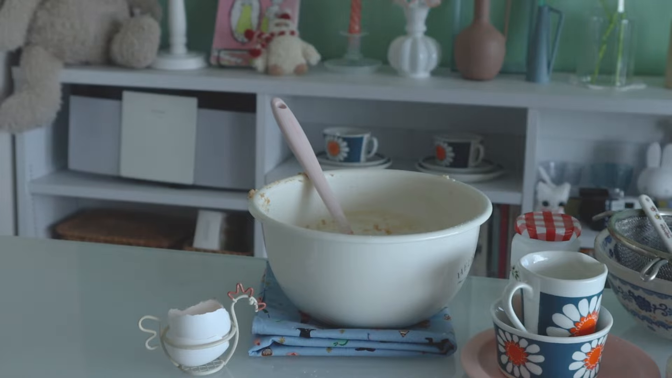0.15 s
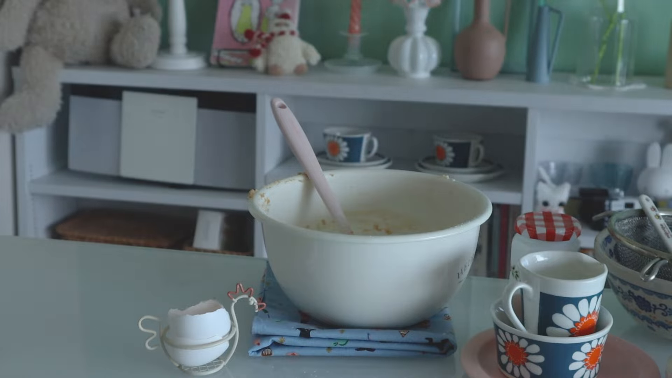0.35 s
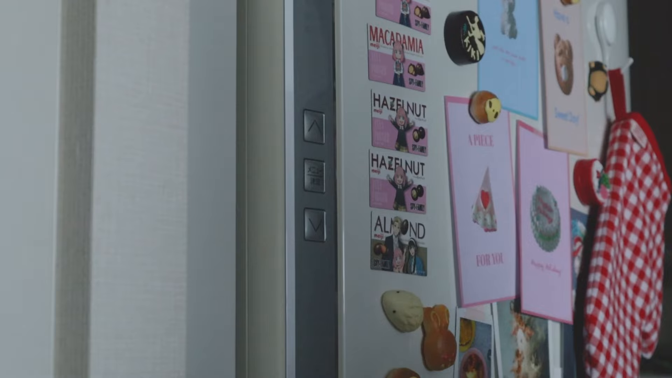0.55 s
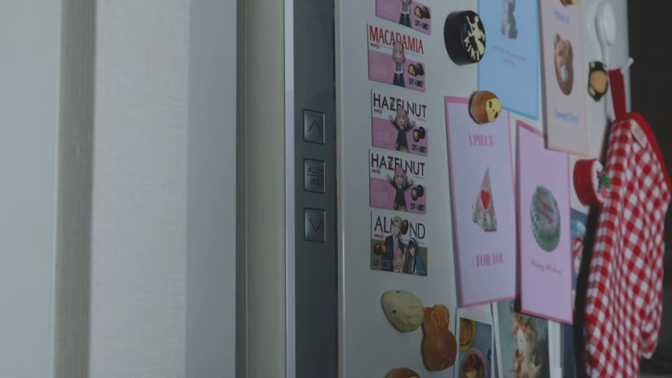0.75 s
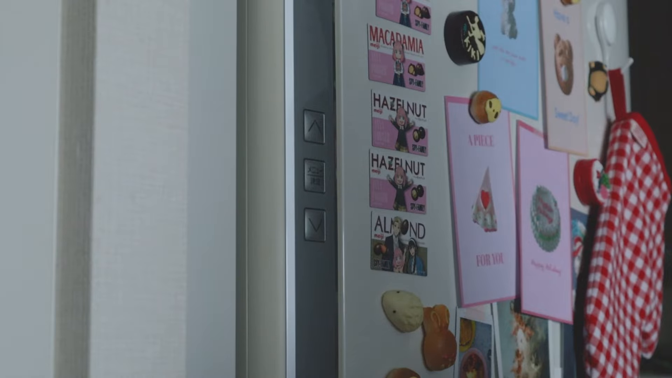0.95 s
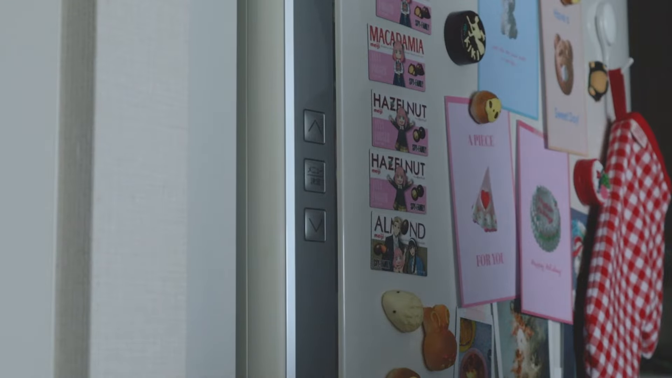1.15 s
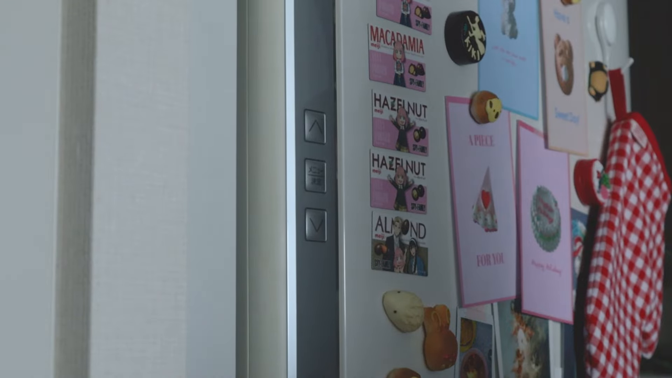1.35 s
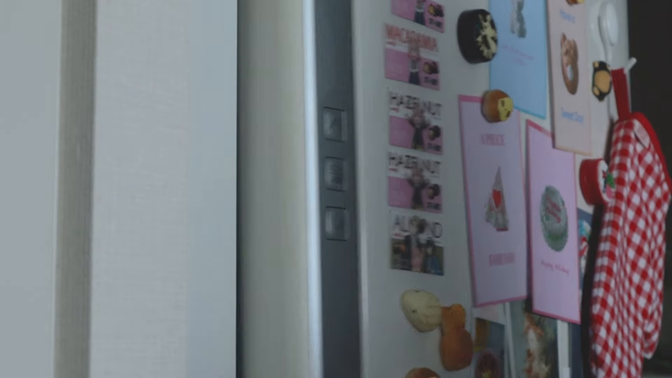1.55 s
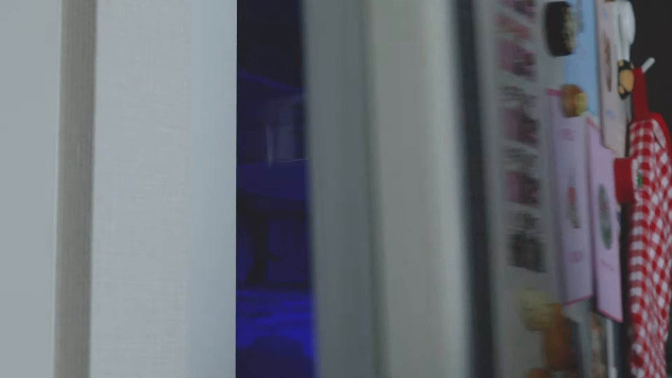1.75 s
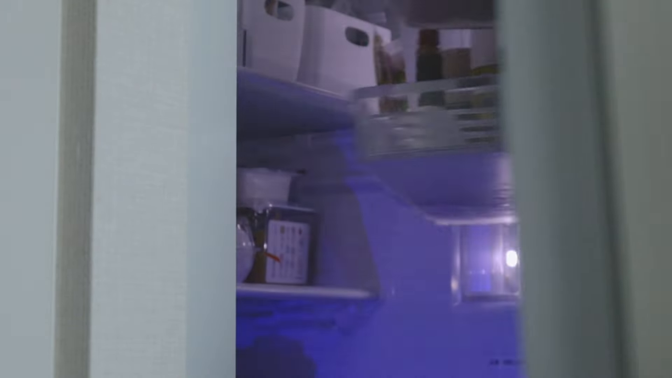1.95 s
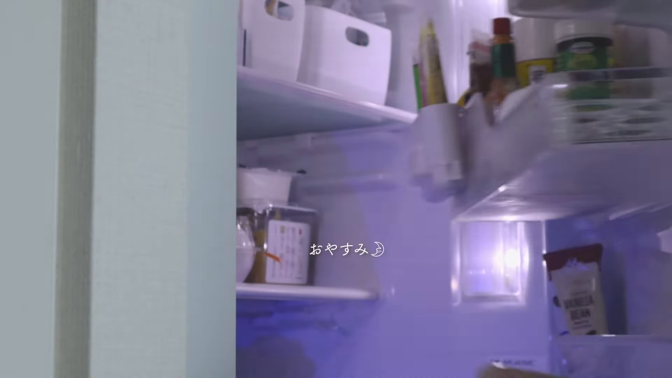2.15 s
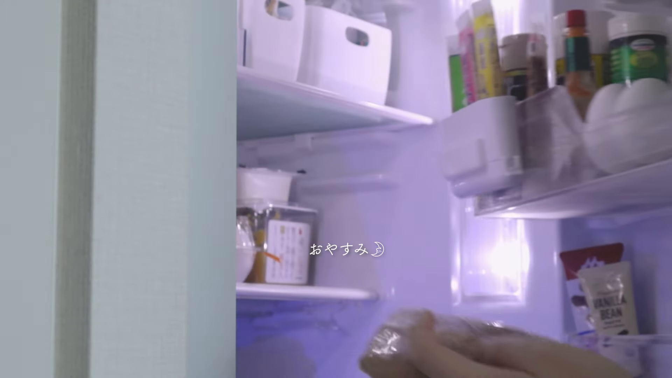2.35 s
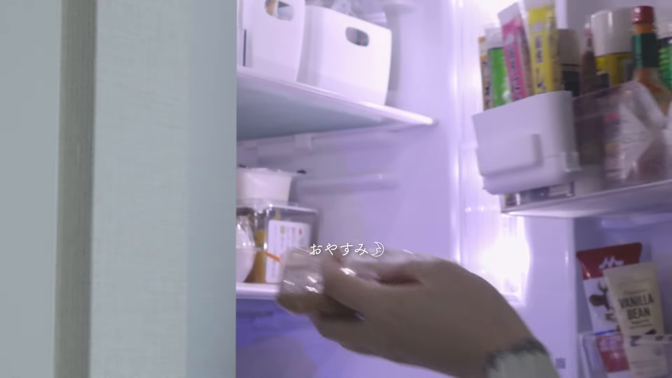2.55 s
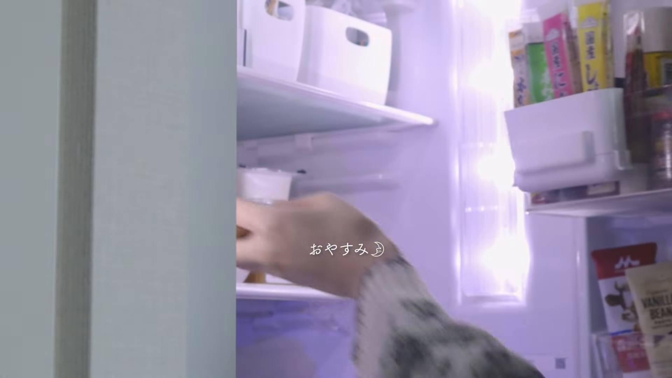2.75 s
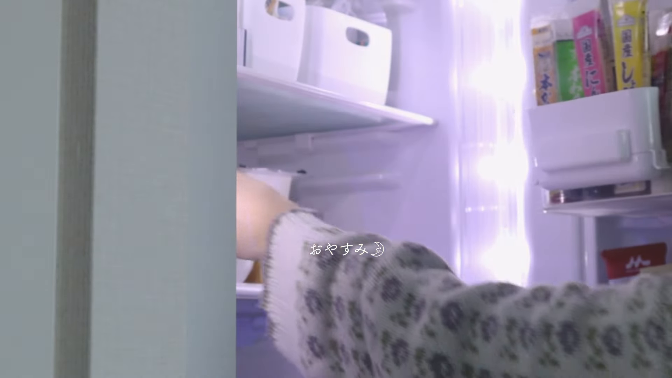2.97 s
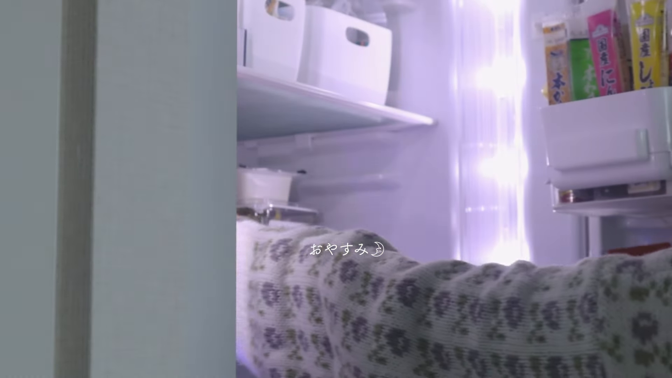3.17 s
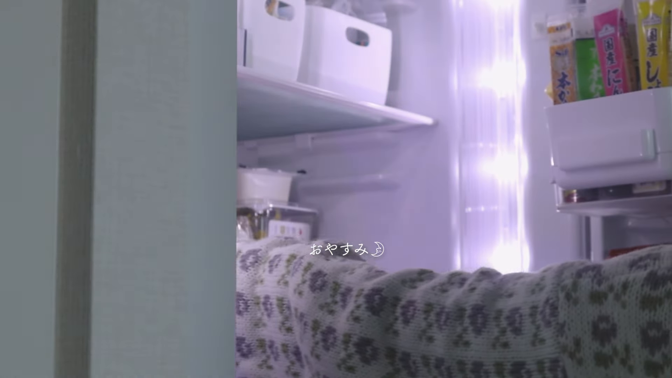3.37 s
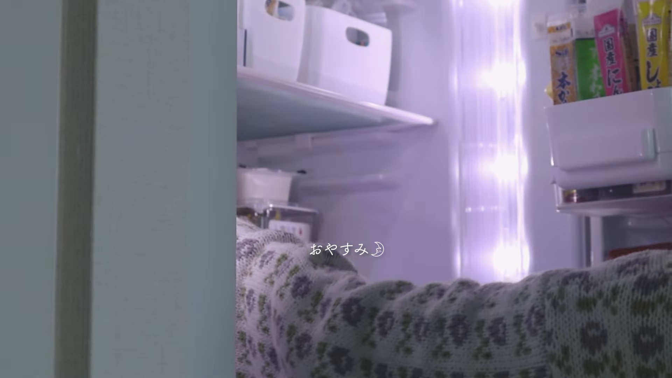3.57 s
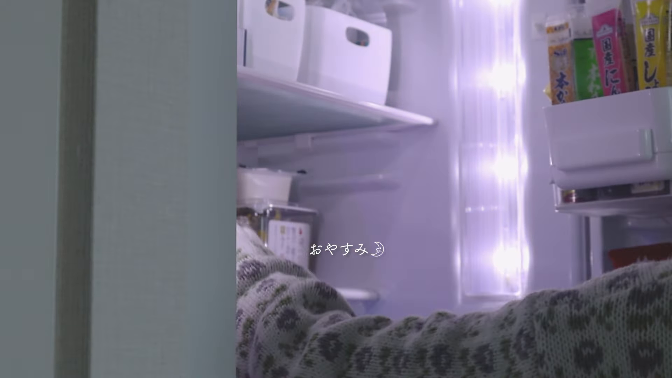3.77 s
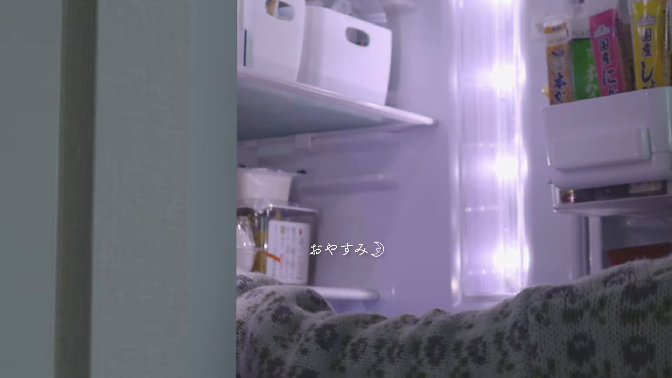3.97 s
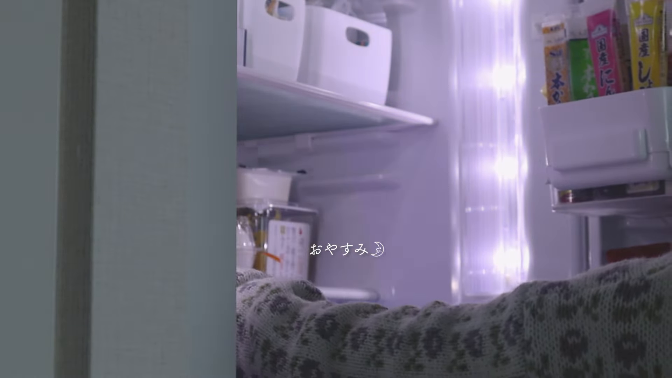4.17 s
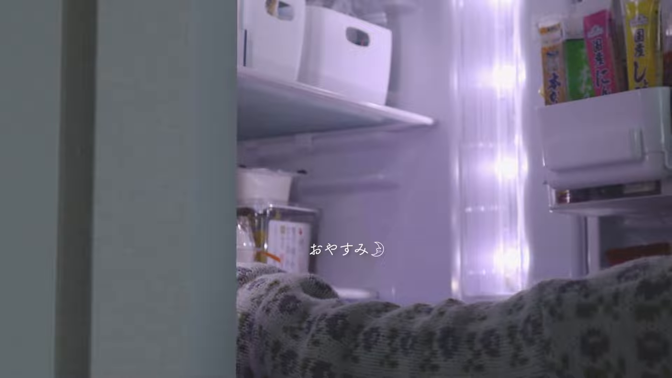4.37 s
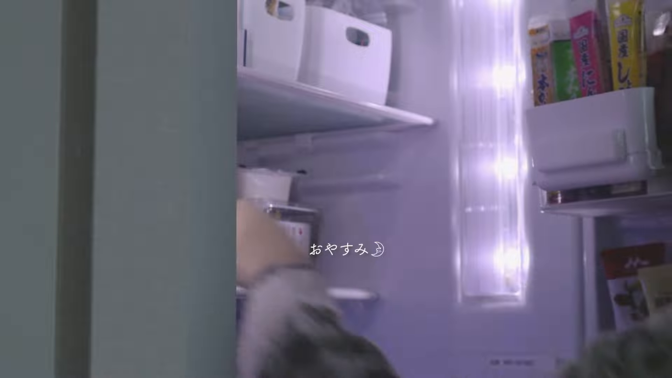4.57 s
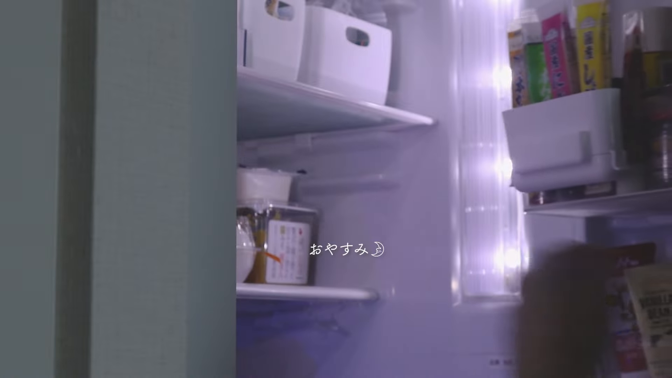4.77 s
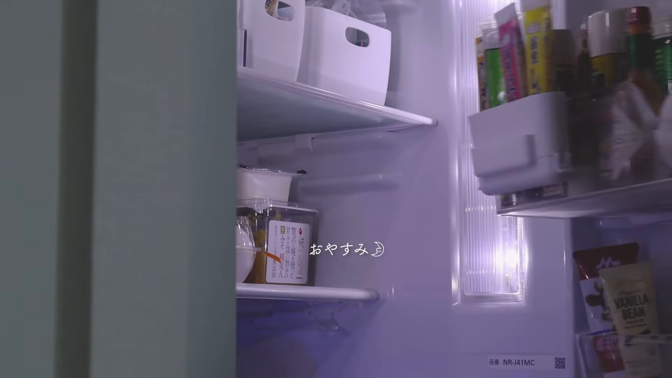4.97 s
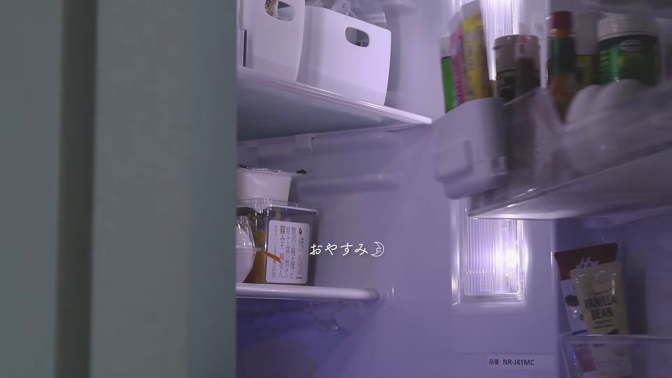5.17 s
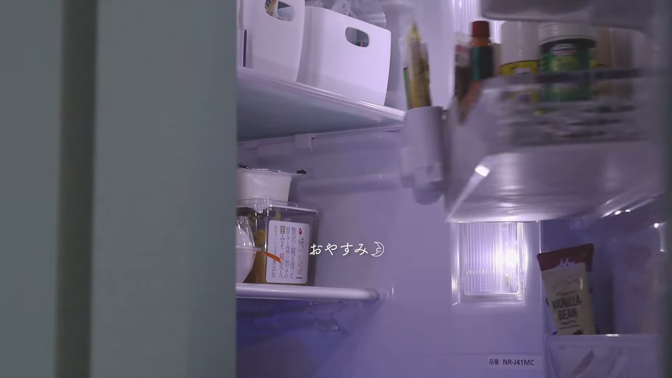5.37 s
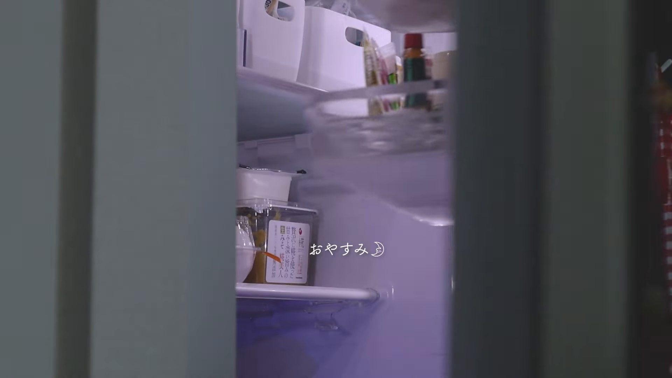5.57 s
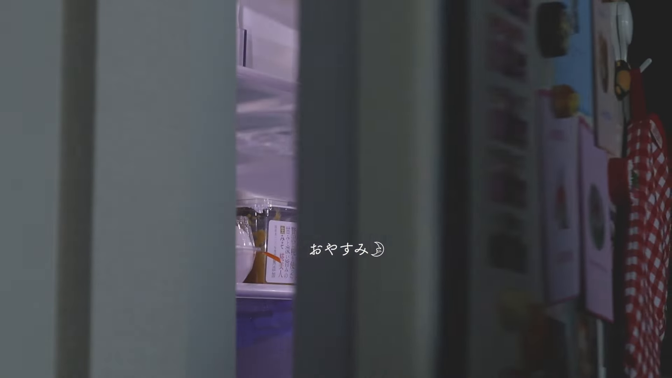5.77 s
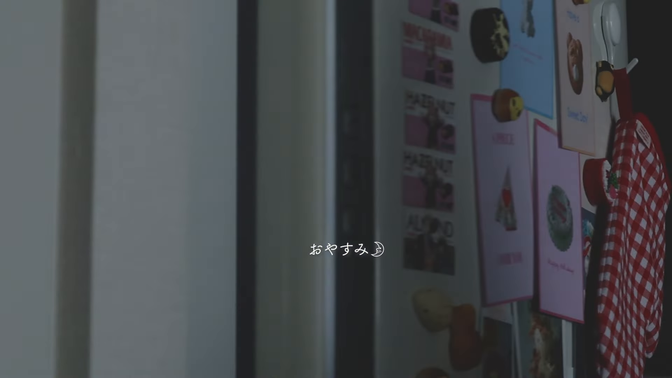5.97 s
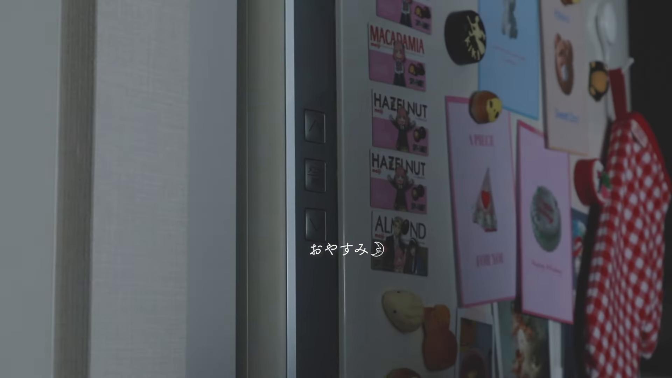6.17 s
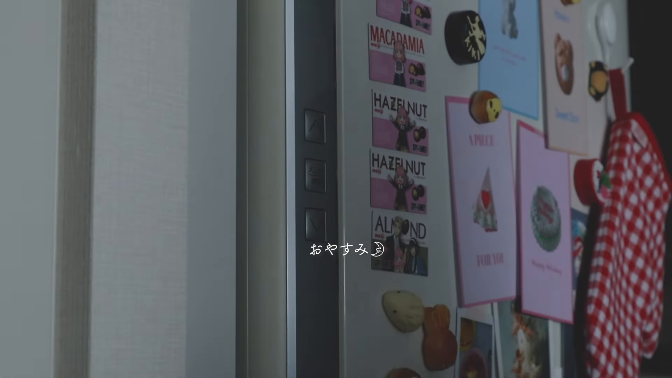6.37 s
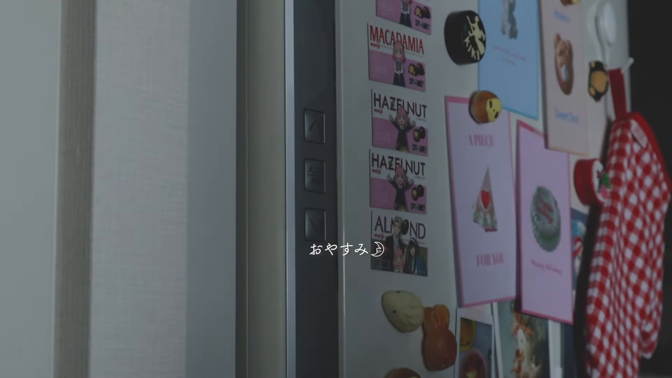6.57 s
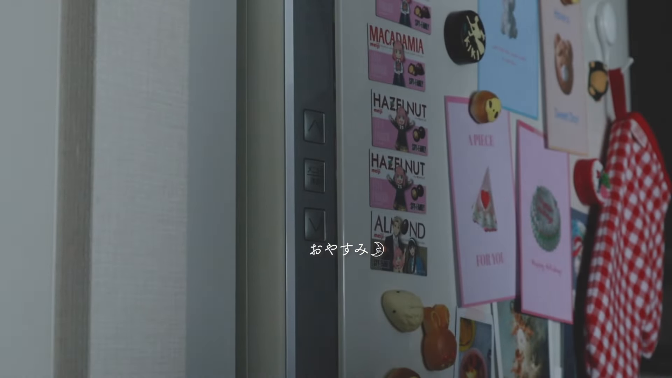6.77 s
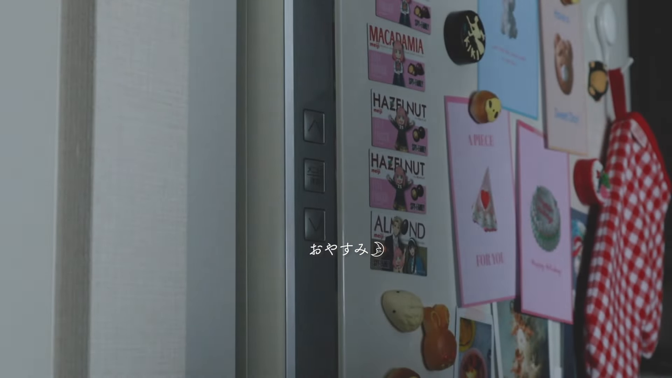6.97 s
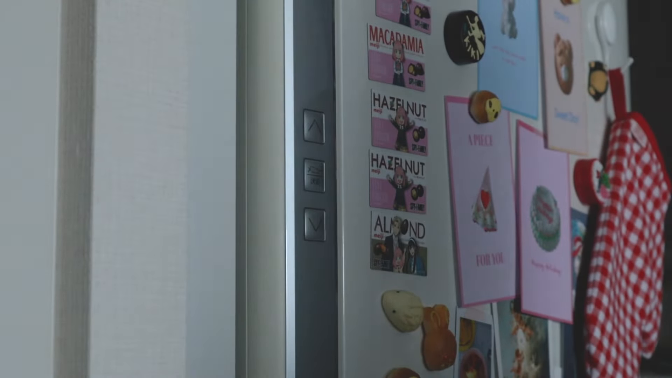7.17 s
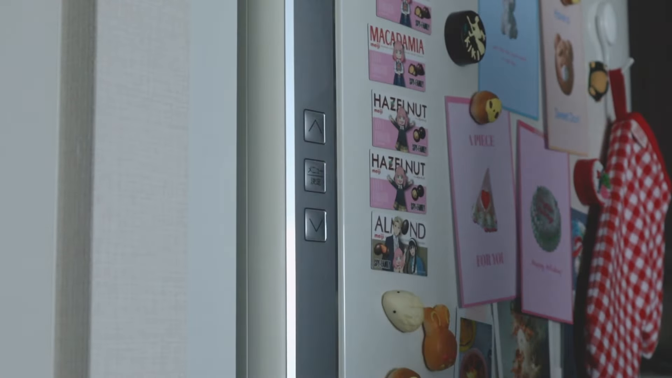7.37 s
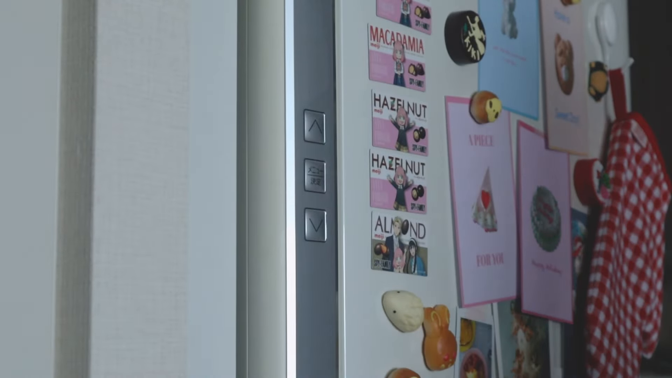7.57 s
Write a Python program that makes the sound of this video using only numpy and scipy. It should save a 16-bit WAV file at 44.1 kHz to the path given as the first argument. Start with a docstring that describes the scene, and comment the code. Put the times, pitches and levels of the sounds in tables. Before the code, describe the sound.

Close view of a fridge in a small, quiet kitchen with low hum and steady hiss. Faint sleeve swishes, then the door seal groans, peels and lets go with a loud hard knock. Bottles rock lightly in the door rack, wrapping crinkles, and a bowl taps a shelf. After a lull the door squeaks, bumps and slams with a dull double thud, followed by faint rustles.

```python
"""A small kitchen hums and hisses; things shift, a sleeve swishes, then a fridge door is pulled off its seal.
Bottles rock in the rack, a wrapped bowl is set on a shelf, and the bottles rock again.
The door swings to, bumps over its closer, slams and rebounds; a few last swishes and shifts follow.
Blows and rubs are noise forces ringing decaying sines; swishes and crinkles are filtered noise.
The near sounds also echo in the kitchen, over a steady hiss that is stronger again above 12 kHz."""
import sys
import numpy as np
from scipy import signal
from scipy.fft import rfft, irfft
from scipy.io import wavfile
from scipy.ndimage import uniform_filter1d

SR = 44100
rng = np.random.default_rng(int(sys.argv[2]) if len(sys.argv) > 2 else 0)


def materialize(psi):
    """Save the field psi as 16-bit PCM at rate SR to the path in sys.argv[1].

    A 1-D psi becomes a single channel; in a 2-D psi each row is a channel.
    """
    bounded = np.clip(np.atleast_2d(psi).T, -1, 1)
    quanta = np.round(bounded * 32767).astype(np.int16)
    wavfile.write(sys.argv[1], SR, quanta)


N = 336249   # length in samples


def from_db(db):
    """Decibels become a plain factor; 20 dB is ten times the height."""
    return 10 ** (np.asarray(db) / 20)


def rms_one(x):
    """Scale a sound to an average (rms) level of 1."""
    return x / np.sqrt(np.mean(x ** 2) + 1e-20)


def in_time(rows):
    """Draw straight lines between rows of (time_s, values), one curve for each value column."""
    times_s, *columns = np.transpose(rows)
    seconds = np.arange(N) / SR
    return [np.interp(seconds, times_s, column) for column in columns]


def at_hz(points, hz):
    """Read a curve of (pitch_hz, value) at any pitch, with pitch on a log scale."""
    pitches_hz, values = np.array(points).T[:2]
    return np.interp(np.log(hz + 1), np.log(pitches_hz), values)


def colour(x, spectrum):
    """Raise and lower the pitches of a noise by a curve of (pitch_hz, level_db)."""
    gains = from_db(at_hz(spectrum, np.fft.rfftfreq(len(x), 1 / SR)))
    return irfft(rfft(x) * gains, len(x))


def band(x, low_hz, high_hz):
    """Keep the pitches between two edges."""
    return signal.sosfilt(signal.butter(2, [low_hz, high_hz], "band", fs=SR, output="sos"), x)


def drift(rate_hz):
    """Slow random wandering with an rms of 1: noise smoothed by a two-pole filter."""
    pole = np.exp(-2 * np.pi * rate_hz / SR)
    wander = signal.lfilter([1], [1, -2 * pole, pole * pole], rng.standard_normal(N + SR))
    return rms_one(wander[SR:])   # the filter settles in the first second


def ring(force, hz, t60_s):
    """A force drives a sine that falls 60 dB in t60_s; a unit click starts it at height 1."""
    pole = from_db(-60 / (t60_s * SR))
    angle = 2 * np.pi * hz / SR
    return signal.lfilter([0, np.sin(angle)], [1, -2 * pole * np.cos(angle), pole * pole], force)


def add(out, start_s, sound):
    """Mix a sound into out from its start time."""
    at = round(start_s * SR)
    out[at:at + len(sound)] += sound[:N - at]


def dying(t60_s, rise_s, lumpy_db=2.5):
    """Uneven noise that rises and dies away, like a contact that chatters."""
    t60_s = max(t60_s, .01)
    t = np.arange(round(SR * min(t60_s * 1.5, 1.5))) / SR
    lumps = np.repeat(rng.standard_normal(len(t) // 100 + 1), 100)[:len(t)]   # a new level every 100 samples
    rise = 1 - np.exp(-t / max(rise_s, 2e-4))
    fall_db = -60 * (t / t60_s) ** 1.092   # holds a little at first, then falls faster
    return rng.standard_normal(len(t)) * rise * from_db(lumpy_db * lumps + fall_db)


MODE_SPREAD = .025   # short modes shift at random by about this share of their pitch


def struck(force, contact_hz, modes, narrow_db, clatter_db):
    """A contact rings the modes near its own pitch (soft low, hard high), over a dense clatter."""
    force = np.pad(force, (0, SR // 5))   # room to ring on
    force = band(force, 0.11 * contact_hz, 4.1 * contact_hz)   # a contact of finite length holds little treble
    body = 0
    for k, (hz, db, t60_s) in enumerate(modes):
        octaves_away = np.log2(hz / contact_hz)
        mode_db = db - narrow_db * octaves_away ** 2 + 1.6 * rng.normal()
        mode_hz = hz * (1 + MODE_SPREAD * rng.normal() * (t60_s < .08))
        sign = (-1) ** k   # neighbours push in opposite directions
        body = body + from_db(mode_db) * ring(force, mode_hz, t60_s) * sign
    clatter = band(force, 0.51 * contact_hz, 1.606 * contact_hz)
    return rms_one(body) + from_db(clatter_db) * rms_one(clatter)


FIRST_TOUCH_DB = 10.5   # height of the click added to the chatter


def blows(table, modes, narrow_db, clatter_db, rise_s):
    """Each row (start_s, level_db, chatter_t60_s, contact_hz) is a first touch, then a chattering contact."""
    out = np.zeros(N)
    for start_s, level_db, t60_s, contact_hz in table:
        force = dying(t60_s, rise_s, 2.5)
        force[round(rise_s * SR)] += from_db(FIRST_TOUCH_DB)
        body = struck(force, contact_hz, modes, narrow_db, clatter_db)
        loudest_rms = np.sqrt(uniform_filter1d(body ** 2, size=400).max())   # over about 9 ms
        add(out, start_s, from_db(level_db) * body / (2.3 * loudest_rms))   # 2.3: rough peak over rms
    return out


def rub(curve, modes, contact_hz, narrow_db, clatter_db, lumpy_db):
    """A lasting rough contact slips unevenly and rings the modes; the curve is (time_s, level_db)."""
    start, stop = round(curve[0][0] * SR), round(curve[-1][0] * SR)
    level = from_db(in_time(curve)[0][start:stop])
    slips = from_db(lumpy_db * drift(60)[:len(level)]) * rng.standard_normal(len(level))
    body = struck(level * rms_one(slips), contact_hz, modes, narrow_db, clatter_db)
    out = np.zeros(N)
    add(out, curve[0][0], body * np.sqrt(np.sum(level ** 2) / len(body)))
    return out


# ringing of the door panel and its liner: pitch_hz [Hz], relative level_db [dB], t60_s [s]
DOOR_MODES = [(349, 18, 0.048), (408, 5, 0.12), (512, 12, 0.027), (612, -6.5, 0.069), (721, 8.5, 0.026),
              (834, 3, 0.023), (1490, -2, 0.016), (1530, -3, 0.013), (1870, -12.5, 0.03),
              (2630, -12.5, 0.016), (3570, -3.5, 0.016)]
# hard knocks on the door (handle, seal letting go, closer, slam):
# start_s [s], ring level_db [dB], chatter_t60_s [s], crack_db before colouring [dB]
DOOR_KNOCKS = [(1.171, -33.5, 0.14, -54), (1.568, -40, 0.4, -44), (1.615, -21.5, 0.062, -37),
               (1.694, -26, 0.05, -45.5), (1.733, -24.5, 0.13, -43.5), (1.782, -9.5, 0.073, -20),
               (1.912, -39, 0.1, -77), (5.853, -44, 0.5, -69), (5.917, -27.5, 0.17, -60),
               (5.997, -29, 0.16, -72), (6.048, -45, 0.42, -68.5), (6.089, -42.5, 0.1, -63),
               (6.193, -36.5, 1, -66), (6.222, -18.5, 0.1, -18), (6.35, -44, 0.2, -65)]
KNOCK_HZ = 1100   # pitch of a hard contact


def door_knocks():
    """Hard contacts ring the door panel around their high contact pitch."""
    rows = [(start_s, db, t60_s, KNOCK_HZ) for start_s, db, t60_s, _ in DOOR_KNOCKS]
    return blows(rows, DOOR_MODES, 7.5, 0.44, 0.0025)


# the shut door rebounds on its soft seal:
# start_s [s], ring level_db [dB], chatter_t60_s [s], contact_hz [Hz], crack_db before colouring [dB]
DOOR_REBOUNDS = [(6.233, -17.5, 0.14, 603, -18.5), (6.274, -18, 0.069, 330, -22.5),
                 (6.345, -26.5, 0.21, 367, -78), (6.418, -51, 0.27, 360, -105)]


def door_rebounds():
    """The soft seal makes lower-pitched contacts that ring the same door panel."""
    return blows([row[:4] for row in DOOR_REBOUNDS], DOOR_MODES, 10.0, -6.0, 0.0018)


# the hand loads the handle and the door groans: time_s [s], level_db [dB]
GRIP_LEVEL = [(1.415, -63), (1.427, -50), (1.471, -45), (1.537, -60), (1.587, -46.5), (1.605, -50),
              (1.61, -40.5)]


def door_groan():
    """Uneven slipping under the hand's pull rings the door close to one pitch, 510 Hz."""
    return rub(GRIP_LEVEL, DOOR_MODES, 510, 19.0, -9.5, 1.7)


# the seal peels off the cabinet: time_s [s], level_db [dB]
PEEL_LEVEL = [(1.645, -38.5), (1.697, -34.5), (1.73, -49)]


def seal_peel():
    """The peeling seal slips unevenly and rings the door broadly around 800.5 Hz."""
    return rub(PEEL_LEVEL, DOOR_MODES, 800.5, 3.8, 1.3, 1.3)


# colour of bright noises, weak from 9.8 to 12 kHz and stronger above: pitch_hz [Hz], level_db [dB]
BRIGHT_COLOUR = [(1500, 6), (6000, -3.5), (8800, -3), (9800, -12), (12000, -11.5), (12300, -4.5),
                 (15500, -5.5)]


def cracks():
    """The treble of each door blow, sheet and jars jolted: short noise that dies away."""
    out = np.zeros(N)
    for start_s, _, t60_s, *_, crack_db in DOOR_KNOCKS + DOOR_REBOUNDS:
        add(out, start_s, from_db(crack_db) * dying(1.29 * t60_s, 0.00062))
    return band(colour(out, BRIGHT_COLOUR), 2500, 10000)


# ringing of bowl and shelf: pitch_hz [Hz], relative level_db [dB], t60_s [s]
SHELF_MODES = [(333, 2.5, 0.23), (401, 3.5, 0.089), (497, 6.5, 0.054), (640, 5.5, 0.037), (770, 1, 0.021),
               (1028, 0.5, 0.025), (1550, 4, 0.015), (1620, -2.5, 0.062), (2070, 13, 0.014),
               (3000, 5, 0.011)]
# the bowl touches the shelf: start_s [s], ring level_db [dB], chatter_t60_s [s], contact_hz [Hz]
BOWL_TOUCHES = [(3.434, -39.5, 0.17, 340), (3.51, -52.5, 0.088, 340), (3.848, -23.5, 0.14, 763),
                (3.891, -25.5, 0.068, 620), (3.917, -32, .11, 513), (4.03, -48, .1, 394),
                (4.121, -27, .1, 700), (4.138, -32.5, .12, 726), (4.19, -48, .15, 270)]


def bowl_on_shelf():
    """Each touch of the bowl rings bowl and shelf near the pitch of that contact."""
    return blows(BOWL_TOUCHES, SHELF_MODES, 5.9, -2.5, 0.0023)


# ringing of bottles and rack: pitch_hz [Hz], relative level_db [dB], t60_s [s]
RACK_MODES = [(490, -1.5, 0.031), (645, 5.5, 0.037), (757, 1, 0.014), (901, 2, 0.055), (1576, 7, 0.033),
              (1730, 11, 0.016)]
# a bottle rocks in the rack: start_s [s], ring level_db [dB]
BOTTLE_ROCKS = [(2.836, -39), (2.943, -41), (3.036, -47), (4.55, -42.5), (4.672, -46.5), (4.795, -48),
                (4.885, -53), (4.962, -56.5)]
ROCK_T60_S, ROCK_HZ = 0.079, 650   # chatter and contact pitch of every rock
# things shift in the rack: start_s [s], ring level_db [dB], chatter_t60_s [s], contact_hz [Hz]
RACK_SHIFTS = [(.528, -54.5, 0.096, 985), (2.362, -37.5, 0.11, 980), (2.80, -46.5, 0.22, 306),
               (6.845, -53, 0.29, 1000), (7.496, -54, 0.67, 535)]


def bottles_in_rack():
    """Rocking bottles and shifting things knock the rack and ring its modes."""
    rocks = [(start_s, db, ROCK_T60_S, ROCK_HZ) for start_s, db in BOTTLE_ROCKS]
    return blows(rocks + RACK_SHIFTS, RACK_MODES, 6.1, -5.0, 0.00242)


# low ringing of the bumps and thumps: pitch_hz [Hz], relative level_db [dB], t60_s at damping 1 [s]
LOW_MODES = [(30.97, -1.5, 0.4), (52.3, -3.5, 0.23), (79.5, 3.5, 0.26), (117, -6.5, 0.22),
             (175.8, 19.5, 0.069), (221, 8.5, 0.1)]
# low bumps and thumps:
# start_s [s], peak_db [dB], push_hz [Hz], damping [1 = free ringing, more = shorter]
LOW_THUMPS = [(0.356, -56, 42, 0.56), (1.604, -43, 73, 0.9), (1.662, -31.5, 87, 1.4),
              (1.692, -31.5, 93, 1.4), (1.783, -29, 86, 1.1), (1.85, -45, 76.5, 0.62),
              (1.91, -51.5, 77.2, 1), (3.459, -46.5, 200.4, 0.6), (3.861, -47, 174, 0.56),
              (4.125, -54.5, 123, 1.1), (5.919, -53.5, 92, 0.59), (5.994, -42, 151, 0.77),
              (6.216, -27, 44.2, 3.6), (6.232, -24, 200, 1.55), (6.274, -28, 210, 0.86),
              (6.346, -35, 119, 0.71)]


def thumps():
    """One soft 4 ms push sets the low modes near its pitch going."""
    out = np.zeros(N)
    push = np.pad(signal.windows.hann(SR // 250), (0, SR // 2))
    for start_s, peak_db, push_hz, damping in LOW_THUMPS:
        thump = 0
        for k, (hz, db, t60_s) in enumerate(LOW_MODES):
            mode_db = db - 18.0 * np.log2(hz / push_hz) ** 2
            thump = thump + from_db(mode_db) * ring(push, hz, t60_s / max(damping, .2)) * (-1) ** k
        add(out, start_s, from_db(peak_db) * thump / np.abs(thump).max())
    return out


# In the next three tables level_db is the noise level before filtering.
# sudden crinkles, and the topmost treble of the door crack:
# start_s [s], level_db [dB], t60_s [s], low_hz [Hz]
SUDDEN_CRINKLES = [(1.442, -44, 0.19, 3970), (1.57, -51.5, 0.14, 5000), (2.308, -47.5, 0.11, 5100),
                   (1.783, -32, 0.12, 11000), (3.423, -36, 0.15, 5950), (3.5, -40, 0.11, 3900),
                   (4.071, -35, 0.22, 6900), (4.101, -32.5, 0.096, 2780), (4.125, -44, 0.074, 3500)]
CRINKLE_RISE_S, CRINKLE_TOP_HZ = 0.0018, 16000
# swishes of sleeve and hand: start_s [s], level_db [dB], t60_s [s], low_hz [Hz], high_hz [Hz]
SLEEVE_SWISHES = [(0.748, -41.5, 0.25, 4070, 16000), (1.403, -48.5, 0.34, 3500, 10000),
                  (2.198, -50.5, 0.64, 5000, 15900), (2.8, -60, 1.7, 1496, 9100),
                  (3.825, -39.5, 0.17, 6000, 16000), (4.67, -57.5, 0.67, 1470, 9000),
                  (6.883, -50, 0.23, 4050, 9660), (7.376, -50, 0.67, 2500, 9300)]
SWISH_RISE = 0.042   # rise time as a share of the t60
# dull scuffs, and a squeak near 800 Hz:
# start_s [s], level_db [dB], t60_s [s], centre_hz [Hz], width [octaves]
SCUFFS_AND_SQUEAK = [(1.429, -43, 0.47, 1760, 0.79), (3.422, -36, 0.21, 2960, 0.93),
                     (3.431, -32.5, 0.18, 1780, 0.56), (5.853, -29, 0.33, 797, 0.32),
                     (7.384, -50.5, 0.82, 1860, .62)]
SCUFF_RISE_S = 0.0038


def rustles():
    """Grainy noise bursts, each in its own band; the sudden ones open with a tick."""
    bursts = []
    for start_s, db, t60_s, low_hz in SUDDEN_CRINKLES:
        bursts.append((start_s, db, CRINKLE_RISE_S, t60_s, low_hz, CRINKLE_TOP_HZ))
    for start_s, db, t60_s, low_hz, high_hz in SLEEVE_SWISHES:
        bursts.append((start_s, db, SWISH_RISE * t60_s, t60_s, low_hz, high_hz))
    for start_s, db, t60_s, centre_hz, octaves in SCUFFS_AND_SQUEAK:
        half = 2 ** (octaves / 2)
        bursts.append((start_s, db, SCUFF_RISE_S, t60_s, centre_hz / half, centre_hz * half))
    out = np.zeros(N)
    for start_s, db, rise_s, t60_s, low_hz, high_hz in bursts:
        burst = dying(t60_s, rise_s, 2.1)
        burst[0] = from_db(25.5) * np.exp(-rise_s / 0.0011)   # the tick, weaker for slow rises
        burst = band(band(burst, low_hz, high_hz), 0.58 * low_hz, 16000)
        add(out, start_s, from_db(db) * burst)
    return colour(out, BRIGHT_COLOUR)


# how long the kitchen echoes: pitch_hz [Hz], t60_s [s]
KITCHEN_T60 = [(60, 0.25), (1500, 0.22), (5000, 0.24), (12000, 0.25)]
KITCHEN_DB = -10   # gain of the echoes, whose tail has an energy of 1


def kitchen(x):
    """Diffuse echoes: octaves of noise, each dying at its own rate."""
    t = np.arange(SR // 2) / SR
    tail = 0
    for hz in 44 * 2. ** np.arange(9):
        octave = band(rng.standard_normal(len(t)), hz / 2 ** .5, hz * 2 ** .5)
        tail = tail + octave * from_db(-60 * t / at_hz(KITCHEN_T60, hz))
    tail = tail * (1 - np.exp(-t / 0.02))   # the echoes build up softly
    # even out the spectrum, so that no pitch stands out of the echoes
    tones = rfft(tail)
    power = abs(tones) ** 2
    evening = np.sqrt(uniform_filter1d(power, size=300) / uniform_filter1d(power, size=20))
    tail = irfft(tones * evening, len(t)) * (t < .4)
    return from_db(KITCHEN_DB) * signal.fftconvolve(x, tail / np.sqrt(np.sum(tail ** 2)))[:N]


# steady background: time_s [s], hum_db before its wavering [dB], hiss_db [dB]
BACKGROUND_LEVELS = [(0, -68.5, -63.5), (.33, -69, -64), (.5, -66, -62), (3, -65, -61.5), (5.3, -66, -64.5),
                     (7.62, -65, -62.5)]
# hum of room and compressor, before band limits: pitch_hz [Hz], level_db [dB per Hz, relative]
HUM_COLOUR = [(41, -19), (70, -3), (97, -10.5), (142, -6), (228, -1.5), (271, -7.5), (866, -15),
              (1050, -13), (1220, -17.5), (3000, -29.5), (3900, -44)]
# steady hiss, stronger again above 12 kHz: pitch_hz [Hz], level_db [dB per Hz, relative]
HISS_COLOUR = [(1000, -12.5), (2500, -9.5), (5000, -12), (9000, -13.5), (12000, -17.5), (12300, -4),
               (15500, -5.5)]
RUMBLE_DB = -76.5


def background():
    """Wavering hum of room and compressor, low rumble and smooth hiss, all from filtered noise."""
    hum_db, hiss_db = in_time(BACKGROUND_LEVELS)
    hum = rms_one(band(colour(rng.standard_normal(N), HUM_COLOUR), 72, 3100))
    hum *= from_db(1.3 * drift(4))   # wavers by about 1.3 dB
    rumble = rms_one(band(band(rng.standard_normal(N), 28, 42), 23, 51.1))
    hiss = rms_one(colour(rng.standard_normal(N), HISS_COLOUR))
    return from_db(hum_db) * hum + from_db(RUMBLE_DB) * rumble + from_db(hiss_db) * hiss


# hiss that differs between left and right: pitch_hz [Hz], level_db [dB per Hz, relative]
SIDE_HISS_COLOUR = [(300, -22.5), (12000, -20), (12300, -0.5), (15500, -6)]
SIDE_HISS_DB = -77


def side_hiss():
    """Faint coloured noise, to be added on the left and subtracted on the right."""
    return from_db(SIDE_HISS_DB) * rms_one(colour(rng.standard_normal(N), SIDE_HISS_COLOUR))


def scene():
    """Everything near the door, its echoes in the kitchen, and the background, as left and right."""
    door = door_knocks() + door_rebounds() + door_groan() + seal_peel() + cracks()
    near = door + bowl_on_shelf() + bottles_in_rack() + thumps() + rustles()
    middle = near + kitchen(near) + background()
    side = side_hiss()
    return np.array([middle + side, middle - side])


def record(dry):
    """A steep filter cuts the top above 15800 Hz."""
    return signal.sosfilt(signal.ellip(12, .5, 60, 15800, fs=SR, output="sos"), dry)


dry = scene()
out = record(dry)
materialize(out)
```